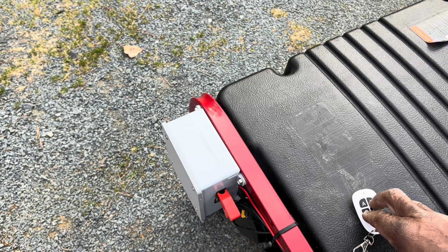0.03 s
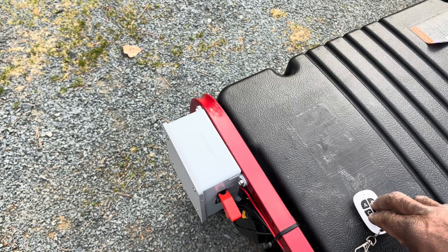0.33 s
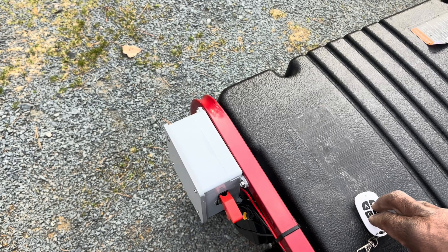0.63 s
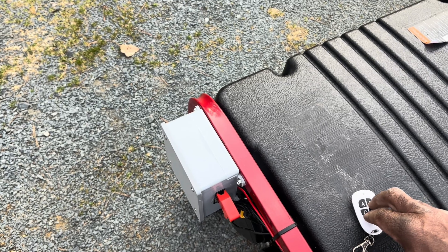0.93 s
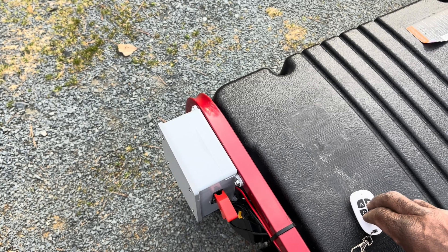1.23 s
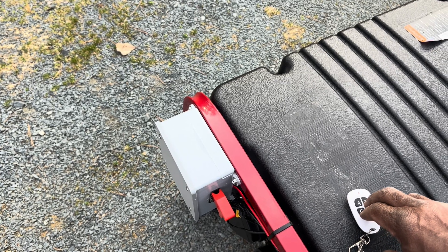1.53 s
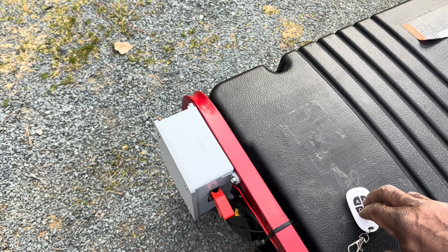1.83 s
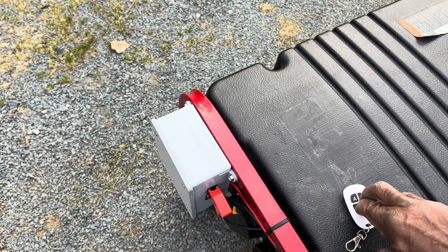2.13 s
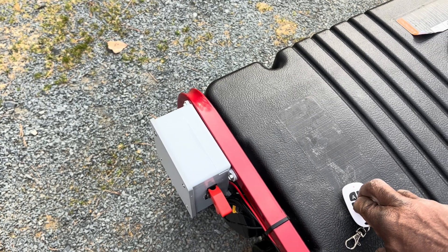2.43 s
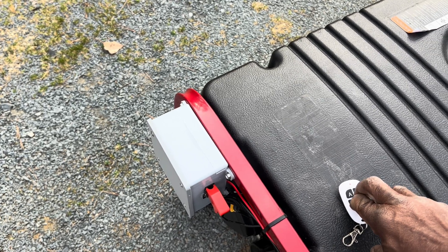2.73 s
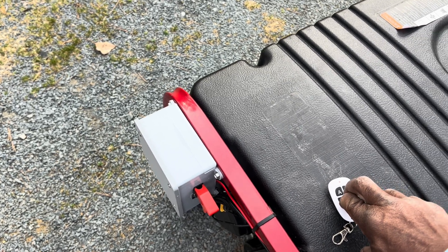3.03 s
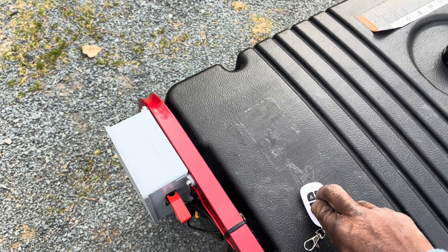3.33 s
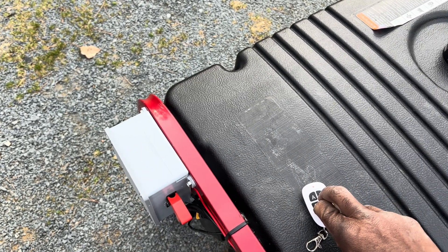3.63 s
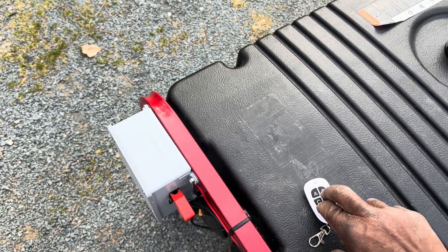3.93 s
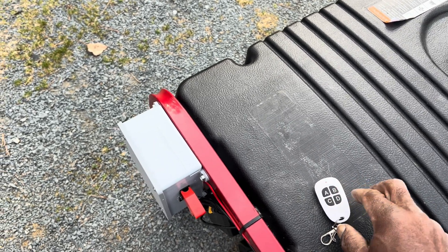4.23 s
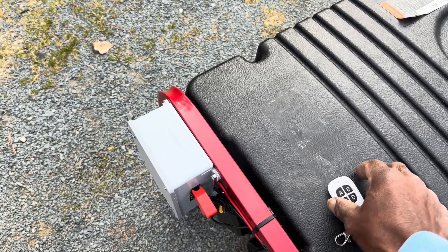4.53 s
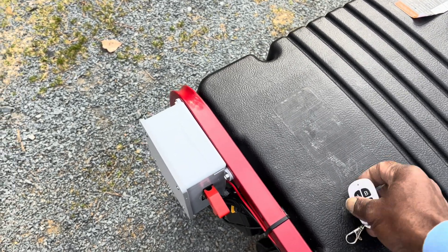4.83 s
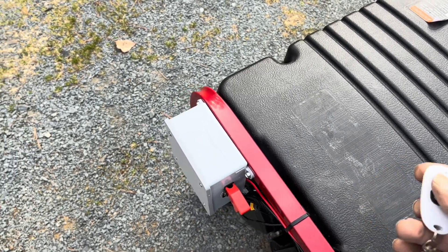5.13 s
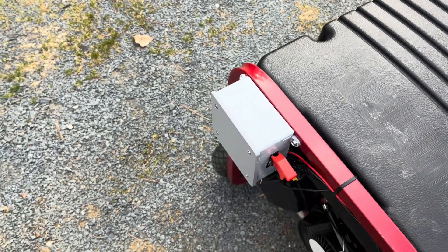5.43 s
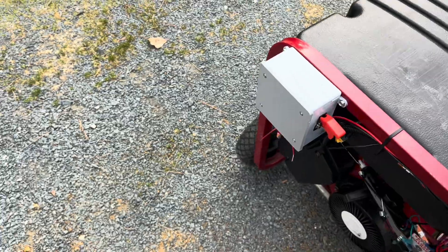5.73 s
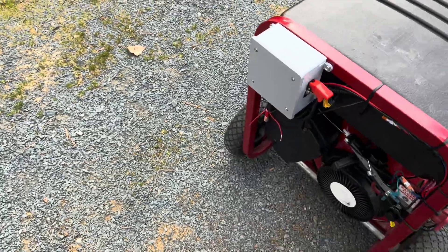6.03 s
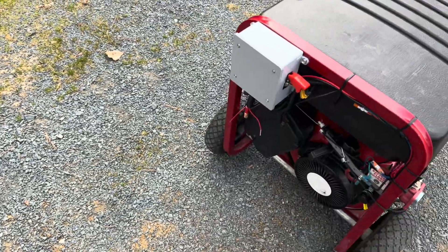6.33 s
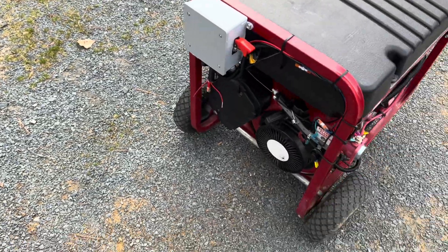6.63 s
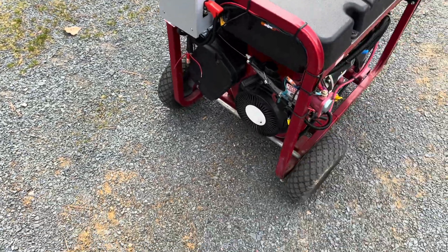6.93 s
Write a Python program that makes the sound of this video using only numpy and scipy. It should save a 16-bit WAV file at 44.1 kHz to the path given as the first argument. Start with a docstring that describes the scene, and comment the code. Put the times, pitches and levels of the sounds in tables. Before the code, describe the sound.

A portable generator fails to start outdoors, heard from close up. Small clicks and a hard metallic slam set off the starter motor, whose rising, rattling whine runs over regular low pulses from the turning engine. The cranking eases slightly, then cuts out, leaving loose metal parts clacking as everything slows to a stop. Faint key ring ticks and a light step on gravel follow.

```python
"""Generator failing to start

A portable generator on gravel, in open air, close to a stereo microphone, is cranked by remote.
Relays tick, the solenoid slams the pinion into the flywheel, and the starter gears whine and rattle
while the single cylinder thumps and puffs without firing. The starter drops out, the engine coasts
to rest with clacking valve gear, a key ring ticks and a foot shifts on the stones."""
import sys
import numpy as np
from scipy import signal
from scipy.fft import rfft, irfft, next_fast_len
from scipy.io import wavfile
from scipy.ndimage import map_coordinates

SR = 44100
rng = np.random.default_rng(int(sys.argv[2]) if len(sys.argv) > 2 else 0)


def generate_wav(sig):
    """Save sig (samples, or channels by samples) to the path in sys.argv[1] as 16-bit PCM at SR."""
    pcm = np.round(np.clip(np.atleast_2d(sig).T, -1, 1) * 32767).astype(np.int16)
    wavfile.write(sys.argv[1], SR, pcm)


N = 308259
TIME = np.arange(N) / SR
AGE = np.arange(SR // 3) / SR  # seconds into one short sound


def amp(db):
    """Decibels to gain."""
    return 10 ** (np.asarray(db) / 20)


def unit(x):
    """Scale to rms 1."""
    return x / np.sqrt(np.mean(x ** 2) + 1e-20)


def along(points, hz):
    """Read (f/Hz, value) points on a log frequency axis."""
    f, v = np.transpose(points)
    return np.interp(np.log(hz + 1), np.log(f + 1), v)


def since(s):
    """Seconds passed since s, zero before it."""
    return np.maximum(TIME - s, 0)


def wobble(rate):
    """A smooth random curve, rate knots a second."""
    return map_coordinates(rng.standard_normal(int(N * rate / SR) + 4), [TIME * rate])


def coloured(x, level_db):
    """x through a causal filter of unit energy, shaped in dB by a function of frequency."""
    size = 8192
    cepstrum = irfft(np.log(amp(level_db(np.fft.rfftfreq(size, 1 / SR))) + 1e-6))
    cepstrum[1:size // 2] *= 2  # fold to minimum phase
    cepstrum[size // 2 + 1:] = 0
    response = irfft(np.exp(rfft(cepstrum)))[:size // 2]
    return signal.fftconvolve(x, response / np.linalg.norm(response))[:len(x)]


def noise(spectrum, size):
    """Noise of rms 1 with a (f/Hz, level/dB) spectrum."""
    return unit(coloured(rng.standard_normal(size), lambda hz: along(spectrum, hz)))


def add(track, s, sound):
    """Mix a sound into the track at time s."""
    part = track[round(s * SR):][:len(sound)]
    part += sound[:len(part)]


def strike(t60, rise):
    """An envelope of peak 1 that swells quickly and dies away."""
    shape = amp(-60 * AGE / t60) * (1 - np.exp(-(AGE / rise) ** 2))
    return shape / shape.max()


def ring(hz, t60, rise):
    """One damped resonance."""
    return strike(t60, rise) * np.sin(2 * np.pi * hz * AGE)


def burst(tone, envelope):
    """A clatter of peak 1 through a body of the given colour."""
    x = coloured(envelope * rng.standard_normal(len(AGE)), tone)
    return x / np.abs(x).max()


def rubbing(strokes, tone, grit_db):
    """Strokes of friction that grate in tiny grains."""
    pressure = np.zeros(N)
    for s, db, length in strokes:
        add(pressure, s, amp(db) * strike(t60=4 * length, rise=length / 3))
    grains = rng.standard_normal(N) * amp(grit_db * wobble(700))
    return pressure * unit(coloured(grains, lambda hz: along(tone, hz)))


# open air around the microphone: f/Hz, level/dB
AIR_TONE = [(20, -22.5), (65, 0), (120, -7.5), (220, -18.5), (330, -18), (950, -35.5), (1400, -25.5),
            (1900, -27), (2800, -41.5), (7400, -44), (15000, -68)]
def outdoors(air_db=-60, side_db=-12):
    """The bed of the place: a low uneven rumble in the centre under faint, wider hiss."""
    air = noise(AIR_TONE, N)
    rumble = signal.sosfilt(signal.butter(2, 200, fs=SR, output="sos"), air)
    side = signal.sosfilt(signal.butter(2, 500, "high", fs=SR, output="sos"), noise(AIR_TONE, N))
    swell = amp(4 * wobble(9))
    return amp(air_db) * (air + rumble * (swell - 1) / 2 + amp(side_db) * np.array([side, -side]))


# dull knocks of a sole: t/s, level/dB, f/Hz
SOLE_KNOCKS = [(5.611, -45, 275), (5.618, -42.5, 128)]
# shoe scuffs: t/s, level/dB, length/s
SHOE_SCUFFS = [(5.612, -48, 0.021), (5.649, -53.5, 0.049), (5.708, -52.5, 0.087), (5.785, -53, 0.07),
               (5.88, -44.5, 0.0059), (6.339, -47.5, 0.026), (6.352, -64, 0.33)]
# dragged stones: f/Hz, level/dB
GRAVEL_TONE = [(120, -32), (200, -1), (364, 3), (935, -5), (1270, -0.5), (2700, -14), (8970, -31),
               (15600, -70)]
def feet():
    """Near the microphone, soles knock on the ground and drag the stones."""
    knocks = np.zeros(N)
    for s, db, hz in SOLE_KNOCKS:
        add(knocks, s, amp(db) * ring(hz, t60=0.046, rise=0.0022))
    return knocks + rubbing(SHOE_SCUFFS, GRAVEL_TONE, grit_db=3.5)


# thumb strokes: t/s, level/dB, length/s
THUMB_RUBS = [(0.4, -60, 0.0061), (0.835, -61.5, 0.006), (0.984, -62, 0.044)]
# the remote's plastic shell: f/Hz, level/dB
PLASTIC_TONE = [(300, -32), (1600, 6), (4500, -8.5), (15000, -38)]
# the key ring jingles as the remote is picked up: t/s, level/dB
CLASP_TICKS = [(4.807, -39), (4.874, -51), (5.109, -46), (5.218, -53), (5.242, -52), (5.379, -54)]
def remote():
    """Close by, a thumb rubs the remote; its steel clasp ticks, differently at every touch."""
    out = rubbing(THUMB_RUBS, PLASTIC_TONE, grit_db=2.0)
    for s, db in CLASP_TICKS:
        modes_hz = np.array([[4300], [7800]]) * (1 + rng.normal(0, 0.13, (2, 1)))
        clasp = lambda hz: 20 * np.log10(np.sum(1 / (1 + ((hz - modes_hz) / 600) ** 2), axis=0))
        add(out, s, amp(db) * burst(clasp, strike(t60=0.016, rise=0.00045)))
    return out


START_S, MESH_S, RELEASE_S, STALL_S = 1.4125, 1.435, 4.1158, 4.94
TOP_CYCLES_PER_S, SPIN_UP_S, DRAG_PER_S = 4.5326, .3912, .8193
REST_ANGLE = .6802  # crank angles are shares of one engine cycle, counted from the exhaust puff
def crank():
    """The crank spins up, then friction slows it: speed as a share of the top rate, and cycles turned."""
    speed = np.maximum(1 - np.exp(-since(START_S) / SPIN_UP_S) - DRAG_PER_S * since(RELEASE_S), 1e-6)
    return speed, REST_ANGLE + TOP_CYCLES_PER_S * np.cumsum(speed) / SR


def passes(angle):
    """(t/s, speed/dB) each time the crank passes an angle, from the first puff until it stalls."""
    speed, cycles = crank()
    marks = np.arange(1 + angle, np.interp(STALL_S, TIME, cycles))
    return [(TIME[i], 20 * np.log10(speed[i])) for i in np.searchsorted(cycles, marks)]


# flywheel and shroud resonances: f/Hz, width/Hz, level/dB
METAL_PEAKS = [(432, 80, 15), (745, 150, 6.5), (1030, 40, 7), (1150, 50, 6), (1295, 110, 12),
               (1538, 110, 9), (1785, 80, 9), (2290, 240, 8.5), (2630, 100, 22), (4400, 230, 10.5),
               (4650, 110, 13), (5550, 600, 9), (7930, 80, 11), (7960, 380, 8.5), (9050, 300, 6)]
def metal_db(hz):
    """The dB that the metal resonances add at each frequency."""
    return sum(db / (1 + (2 * (hz - centre) / width) ** 2) for centre, width, db in METAL_PEAKS)


# colour of the valve cover: f/Hz, level/dB
COVER_TONE = [(180, -44.5), (300, -10.5), (559, -13), (943, -16), (1470, -13.5), (4200, -27.5), (6400, -43),
              (8400, -37), (10300, -49), (15000, -56)]
# modes of the rockers, cover and frame: f/Hz, level/dB, t60/s
CLINK_MODES = [(424, -3.5, 0.51), (695, 0.5, 0.14), (1114, -8.5, 0.23), (1459, -1, 0.08), (1610, -3, 0.11),
               (2115, -3.5, 0.14), (2472, -3, 0.11), (2960, -8, 0.12), (4050, -6.5, 0.054)]
def clack(pitch_hz, brightness, focus_db=6, crack_db=-2.5):
    """A short crack and the metal's ring; where the part strikes decides which modes speak."""
    tilt_db = 0.38 * (brightness + 26)  # per octave: harder contacts are brighter
    treble = lambda hz: tilt_db * np.log2(1 + hz / 1000) - 4 * np.log2(np.maximum(hz / 4800, 1))
    tone = lambda hz: along(COVER_TONE, hz) + 0.18 * metal_db(hz) + treble(hz)
    clink = 0
    for hz, db, t60 in CLINK_MODES:
        louder, detune, phase = rng.standard_normal(3)
        mode = np.sin(2 * np.pi * (hz * (1 + .018 * detune) * AGE + phase))
        mode_db = db + 3 * louder - focus_db * abs(np.log2(hz / pitch_hz))
        clink = clink + amp(mode_db) * strike(t60, rise=0.00137) * mode
    return .7 * clink / np.abs(clink).max() + amp(crack_db) * burst(tone, strike(t60=.08, rise=.0011))


# loose parts knock as the engine rocks to rest: t/s, level/dB, favoured f/Hz, brightness
LOOSE_PARTS = [(4.189, -17.5, 1070, -31), (4.201, -22.5, 970, -35), (4.225, -27, 2600, 1),
               (4.349, -46, 2400, -20), (4.378, -27, 2360, -12), (4.437, -39, 1600, -19),
               (4.475, -36, 1620, -15), (4.507, -28, 1630, -5), (4.536, -29.5, 1500, -12),
               (4.593, -34, 1400, -11), (4.688, -31.5, 1690, -20), (4.736, -28, 1493, -19),
               (4.835, -31.5, 1500, -17), (4.896, -37, 1310, -30), (4.97, -32, 1440, -6),
               (5.024, -36.5, 2050, -27), (5.089, -39.5, 900, -18), (5.134, -36.5, 1400, -17),
               (5.265, -32, 1890, -28), (5.341, -36.5, 1800, -28), (5.41, -38, 684, -42),
               (5.439, -43, 694, -62), (5.486, -46.5, 1294, -32)]
def valve_gear(slide_db=-42, settle_db=-62.5, settle_s=5.5):
    """Parts slide and valves pop as the crank turns; loose parts clack once the starter drops out."""
    slide = unit(coloured(rng.standard_normal(N), lambda hz: along(COVER_TONE, hz) + .27 * metal_db(hz)))
    speed, _ = crank()
    stirring = amp(settle_db - 220 * since(settle_s)) * (TIME > MESH_S)
    chatter = unit(amp(3 * wobble(120)))
    out = slide * chatter * (amp(slide_db) * speed ** 1.8 + stirring)
    for s, db, hz, brightness in LOOSE_PARTS:
        add(out, s, amp(db) * clack(hz, brightness))
    for angle, db in [(0.423, -32), (.92, -33)]:  # each valve lifts with a hollow pop in its port
        for s, speed_db in passes(angle):
            add(out, s, amp(db + 0.81 * speed_db) * ring(hz=326.3, t60=0.044, rise=0.0038))
    return out


# a dull rush of air: f/Hz, level/dB
ROAR_TONE = [(25, -22.5), (65, 6.5), (230, -5), (600, -20.5), (6000, -78.5)]
def roar(t60, rise, db=-19):
    """The short, rough gust that goes with each puff and thump."""
    return amp(db) * strike(t60, rise) * noise(ROAR_TONE, len(AGE))


# the hollow ring of each thump: f/Hz, t60/s, level/dB
HOLLOW_MODES = [(441.6, 0.099, -11), (520, 0.012, -27.5)]
def compression_thumps(thump_hz=125, hollow_db=-8.0, rebound_s=4.975, rebound_db=-25):
    """Each compression gives a small and a large low thump, with a hollow ring."""
    out = np.zeros(N)
    thumps = [(s, db + 0.99 * speed_db)
              for angle, db in [(.578, -23), (0.647, -16.5)] for s, speed_db in passes(angle)]
    thumps.append((rebound_s, rebound_db))  # trapped air throws the piston back
    for s, db in thumps:
        hollow = sum(amp(level + rng.normal(0, 1.3)) * ring(hz, t60, rise=0.003)
                     for hz, t60, level in HOLLOW_MODES)
        thump = ring(thump_hz * (1 + rng.normal(0, 0.11)), t60=0.062, rise=0.0057)
        add(out, s, amp(db) * (thump + roar(t60=0.19, rise=.006)) + amp(.5 * db + hollow_db) * hollow)
    return out


def exhaust(puff_db=-14, start_hz=230, end_hz=56, sag_s=0.007, lead_s=0.0068, shell_db=-17):
    """The valve opens and a slug of air leaves the muffler, its pitch sagging as the pressure falls."""
    out = np.zeros(N)
    flow = np.sin(np.pi * np.minimum(AGE / .035, 1) ** .65) ** 2
    glide_hz = end_hz + (start_hz - end_hz) * np.exp(-AGE / sag_s)
    for s, speed_db in passes(0):
        puff = flow * np.sin(2 * np.pi * np.cumsum(glide_hz * (1 + rng.normal(0, 0.035))) / SR)
        shell = amp(shell_db + rng.normal(0, 1.58)) * ring(hz=189, t60=0.07, rise=0.012)
        gust = roar(t60=0.2, rise=0.0029)
        add(out, s - lead_s, amp(puff_db + 0.58 * speed_db) * (puff + shell + gust))
    return signal.sosfilt(signal.butter(1, 25, "high", fs=SR, output="sos"), out)


# relay and solenoid contacts: t/s, level/dB, t60/s
RELAY_TICKS = [(1.196, -37, 0.013), (1.284, -29.5, 0.0056), (1.345, -29, 0.011), (1.4004, -5.5, 0.03)]
# colour of a contact: f/Hz, level/dB
TICK_TONE = [(120, -56.5), (200, -0.5), (2170, -13), (3020, -4.5), (6400, -16.5), (8420, -7.5),
             (13000, -19.5), (15000, -14)]
# plunger and pinion strike home: t/s, level/dB, t60/s
PINION_SLAMS = [(1.412, -20, 0.39), (1.434, -2.5, 0.058), (1.4443, -8, 0.36)]
# colour of a slam: f/Hz, level/dB
PINION_TONE = [(59, -42), (100, -12.5), (304, -4), (718, -4.5), (1370, -15.5), (2630, -13), (3920, -25.5),
               (15000, -36.5)]
def solenoid():
    """Relays tick, the solenoid snaps shut and the pinion slams into the flywheel."""
    out = np.zeros(N)
    for s, db, t60 in RELAY_TICKS:
        add(out, s, amp(db) * burst(lambda hz: along(TICK_TONE, hz), strike(t60, rise=0.000468)))
    for s, db, t60 in PINION_SLAMS:
        add(out, s, amp(db) * burst(lambda hz: along(PINION_TONE, hz), strike(t60, rise=0.0029)))
        add(out, s, amp(db - 8.0) * ring(hz=241.9, t60=0.2, rise=0.0022))
    return out


def smeared(x, t60):
    """Bending waves cross a plate at different speeds, spreading a sharp blow in time."""
    paths = rfft(rng.standard_normal(len(AGE)) * amp(-60 * AGE / t60))
    response = irfft(paths / np.abs(paths) ** .9, len(AGE))[:SR // 20]
    return signal.fftconvolve(x, response / np.linalg.norm(response))[:len(x)]


# broad colour of the engine casing: f/Hz, level/dB
CASING_TONE = [(60, -14), (150, -3.5), (550, -1), (2300, -3), (3500, -3.5), (5600, -4.5), (6700, -7),
               (9500, -4.5), (12000, -7), (15500, -21)]
def casing(x, wander_hz=20):
    """The casing rings, wandering between two tunings as the contact moves round the flywheel."""
    low, high = (coloured(x, lambda hz: along(CASING_TONE, hz) + metal_db(hz + by * np.tanh(hz / 2000)))
                 for by in [wander_hz, -wander_hz])
    blend = np.pi / 4 * (1 + np.tanh(2 * wobble(20)))
    return low * np.cos(blend) + high * np.sin(blend)


# valve spring, free intake stroke, compression and overrun:
# angle/cycles, width/cycles, load/dB, speed change/share, power of crank speed that scales the effect
CYCLE_LOADS = [(.29, .07, 1.8, -.055, 2), (.51, .06, -1.2, .01, 2), (.67, .075, 4.2, -.07, 1),
               (.8, .07, -5.5, -.09, 8)]
# the motor races, labours against the first compression, then surges: t/s, width/s, speed change/share
FIRST_SURGES = [(1.555, .04, .17), (1.66, .06, -.22), (1.87, .04, .08), (2.1, .05, .06)]
def tooth_load(speed, cycles):
    """Each stroke loads or frees the gear teeth: the load in dB and a factor on their speed."""
    load_db, pace = 0, 1
    for angle, width, db, change, grows in CYCLE_LOADS:
        bump = speed ** grows * np.exp(-((cycles % 1 - angle) / width) ** 2)
        load_db, pace = load_db + db * bump, pace + change * bump
    for s, width, change in FIRST_SURGES:
        pace = pace + change * np.exp(-((TIME - s) / width) ** 2)
    return load_db, pace


# the slack pinion catches up with the flywheel: t/s, level/dB over the steady rattle
GEAR_CLASHES = [(2.497, 4), (2.718, 3.5), (2.948, 4), (3.166, 4.5), (3.397, 6.5), (3.643, 6), (3.837, 6),
                (4.06, 8)]
def pinion_clashes(slack_s=.012):
    """The teeth part for an instant, then clash: the blows and the slackness before them."""
    clashes, slack = np.zeros(N), 0
    for s, db in GEAR_CLASHES:
        add(clashes, s, amp(db) * strike(t60=0.086, rise=0.00027) * rng.standard_normal(len(AGE)))
        slack = slack + np.exp(-((TIME - s) / slack_s + .5) ** 2)
    return clashes, slack


# a bouncing tooth thuds into the casing: f/Hz, level/dB over the casing's colour
BOUNCE_TONE = [(200, -6), (1200, 2), (9000, -8)]
def gear_rattle(teeth, running, load_db, scatter_db=5, bounce_share=.075, bounce_db=-6.5, side_db=-14):
    """Pinion teeth strike the ring gear: the stereo rattle, and the teeth's grip as a gain."""
    tooth = np.arange(1, int(teeth[-1]))
    # backlash scatters the moment and the force of every contact
    late, hard = rng.standard_normal((len(tooth), 2)).T
    at = np.interp(tooth + .12 * late, teeth, np.arange(N)).astype(int)
    blows = np.bincount(at, amp(scatter_db * np.tanh(hard)), N)
    blows = blows / blows[running].std() + .4 * rng.standard_normal(N)
    # now and then a tooth bounces and knocks harder
    bounces = np.bincount(at, rng.random(len(at)) < bounce_share, N)
    bounces = np.tanh(signal.fftconvolve(bounces, strike(t60=0.018, rise=.0003))[:N])
    bounces *= rng.standard_normal(N)
    clashes, slack = pinion_clashes()
    grip = amp(load_db - 3 * slack)
    # the pinion bites unevenly, and the casing rings on between bites
    blows = blows * grip * amp(3 * np.tanh(wobble(150))) + clashes
    mid, side = (casing(smeared(face, t60=0.022)) for face in [blows, blows * rng.standard_normal(N)])
    thud_tone = lambda hz: along(CASING_TONE, hz) + .5 * metal_db(hz) + along(BOUNCE_TONE, hz)
    thuds = coloured(bounces, thud_tone)
    thuds = amp(bounce_db) * grip * thuds / thuds[running].std()
    return mid + thuds + amp(side_db) * np.array([side, -side]), grip


# the tooth rate and its multiples, in order: level/dB
MESH_HARMONICS = [-5, 0, 1, -3, -7, -8, -7, -7]
def gear_whine(teeth, running):
    """The bending teeth sing through the casing, each harmonic wavering in level."""
    slop = .5 * wobble(130)
    mesh = sum(amp(db + 7 * np.tanh(wobble(30))) * np.sin(2 * np.pi * k * teeth + slop)
               for k, db in enumerate(MESH_HARMONICS, 1))
    whine = coloured(mesh, lambda hz: along(CASING_TONE, hz) + .5 * metal_db(hz))
    return whine / whine[running].std()


TEETH_PER_CYCLE = 177.5
GEARS_DB, EFFORT_DB, EASE_DB_PER_S = -20, 23, 1.93
LET_GO_S, LET_GO_DB, LET_GO_FALL_S, RUN_OUT_DB_PER_S = 4.095, 6, 0.043, 133
def starter(whine_db=-17, whine_power_db=12.5, bite_db=-28, bite_t60=0.78):
    """The main source, close up: the pinion grinds in, cranks the engine, leaves and spins out."""
    speed, cycles = crank()
    running = speed > .5
    effort = np.exp(-since(START_S) / SPIN_UP_S)
    power = 27 / 4 * effort * speed ** 2  # peaks at 1
    load_db, pace = tooth_load(speed, cycles)
    judder = 1 + .009 * (wobble(110) + wobble(28))
    teeth = np.cumsum(TEETH_PER_CYCLE * TOP_CYCLES_PER_S * speed * pace * judder) / SR
    rattle, grip = gear_rattle(teeth, running, load_db)
    # loaded teeth sing, slack teeth mostly rattle
    whine = grip * amp(whine_db + whine_power_db * power + 1.5 * load_db) * gear_whine(teeth, running)
    # louder with speed and effort, easing as the cranking goes on
    drive = speed ** 1.805 * amp(GEARS_DB + EFFORT_DB * effort - EASE_DB_PER_S * since(MESH_S))
    bite = amp(bite_db - 60 * since(MESH_S) / bite_t60)
    free_s = since(LET_GO_S)
    leaving_db = LET_GO_DB * np.minimum(free_s / LET_GO_FALL_S, 1) + RUN_OUT_DB_PER_S * free_s
    return (drive + bite) * amp(-leaving_db) * (TIME > MESH_S) * (rattle + whine)


# left microphone port over right: f/Hz, level/dB
LEFT_LEVEL = [(200, 0.5), (740, -6.5), (1220, 0.5), (2010, -2.5), (3330, 2), (9080, 0)]
# left port ahead of right: f/Hz, phase/rad
LEFT_PHASE = [(100, 0), (3190, 0.535), (8000, 1), (8900, 0), (11700, -6), (15200, -13.5)]
def microphone(x, echo_db=-15, echo_t60=0.088):
    """Frame and ground scatter the sound; each microphone port hears it at its own level and phase."""
    tail = rng.standard_normal((2, len(AGE))) * strike(echo_t60, rise=0.00066)
    tail = signal.sosfilt(signal.butter(2, 400, "high", fs=SR, output="sos"), tail)
    pair = x + amp(echo_db) * signal.fftconvolve(x, tail / np.linalg.norm(tail[0]), axes=1)[:, :N]
    size = next_fast_len(N + SR // 2)
    hz = np.fft.rfftfreq(size, 1 / SR)
    half = np.array([[.5], [-.5]])
    ports = amp(half * along(LEFT_LEVEL, hz)) * np.exp(1j * half * along(LEFT_PHASE, hz))
    return irfft(rfft(pair, size) * ports, size)[:, :N]


def scene():
    """The generator, the remote and the feet close to the microphone, in open air."""
    generator = solenoid() + starter() + compression_thumps() + exhaust() + valve_gear()
    return microphone(generator + remote() + feet()) + outdoors()


LOW_CUT_HZ, TOP_HZ = 31, 16100
def record(dry):
    """The recorder cuts the deepest rumble and keeps nothing above its band limit."""
    size = next_fast_len(N + SR // 2)
    hz = np.fft.rfftfreq(size, 1 / SR)
    low_cut = 1 - np.exp(-(hz / LOW_CUT_HZ) ** 4)
    high_cut = np.clip((TOP_HZ - hz) / 400 + .5, 0, 1)
    return irfft(rfft(dry, size) * low_cut * high_cut, size)[:, :N]


dry = scene()
out = record(dry)
generate_wav(out)
```